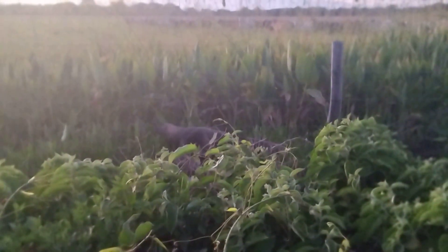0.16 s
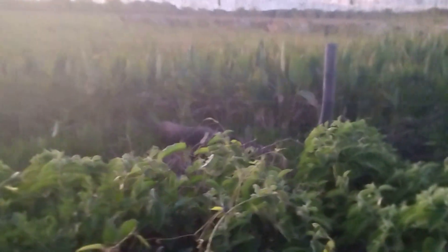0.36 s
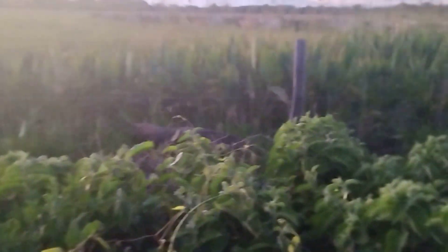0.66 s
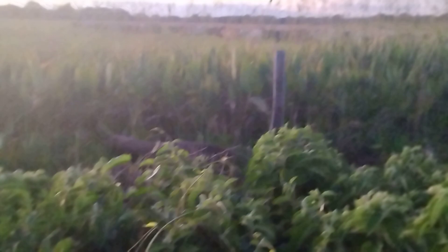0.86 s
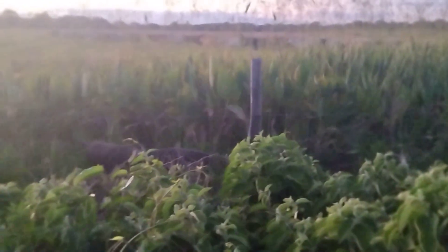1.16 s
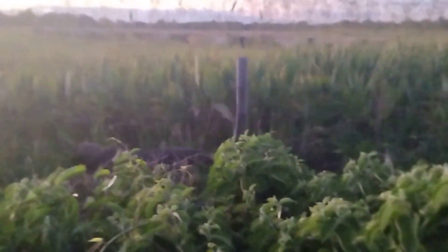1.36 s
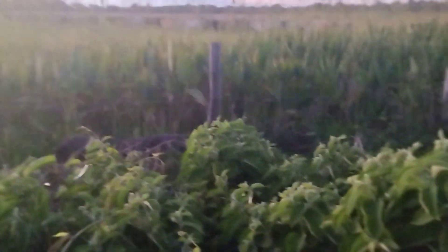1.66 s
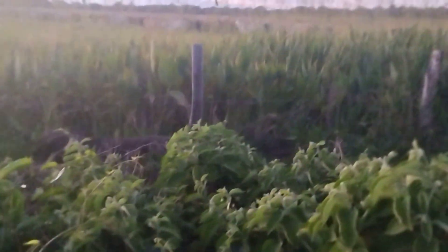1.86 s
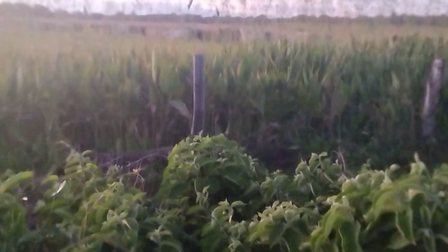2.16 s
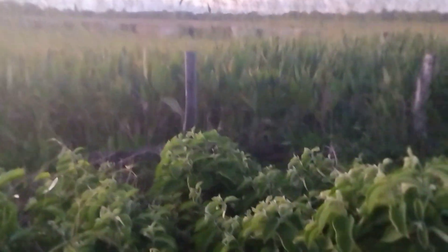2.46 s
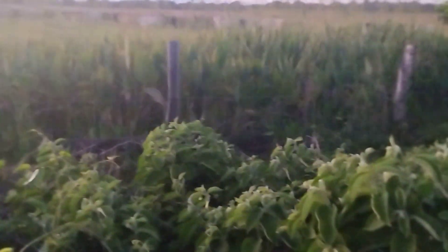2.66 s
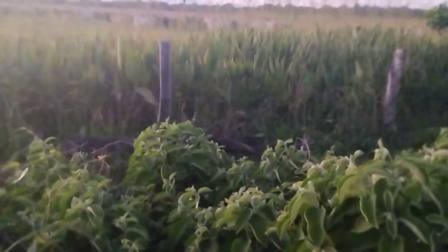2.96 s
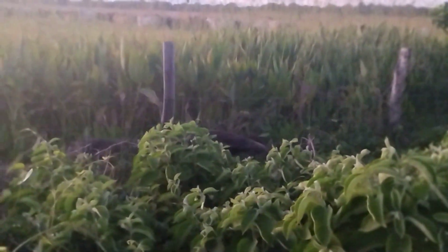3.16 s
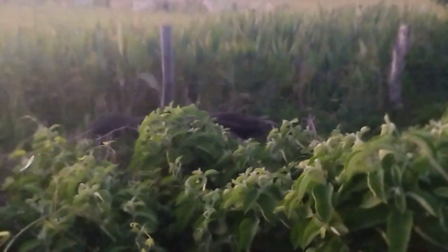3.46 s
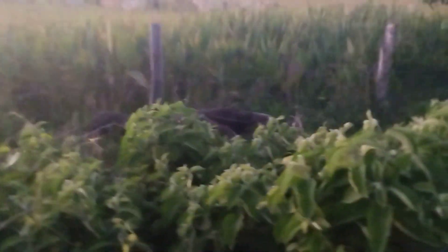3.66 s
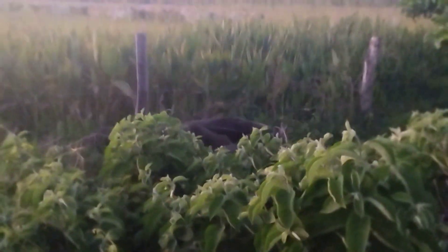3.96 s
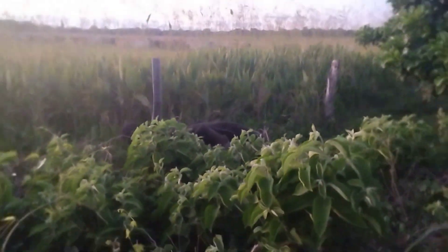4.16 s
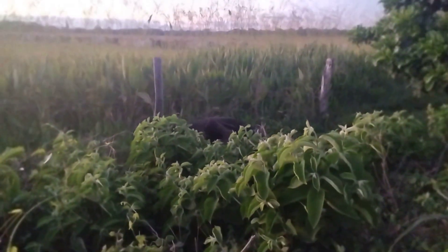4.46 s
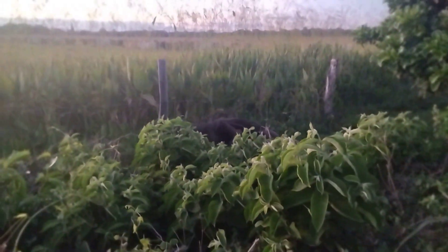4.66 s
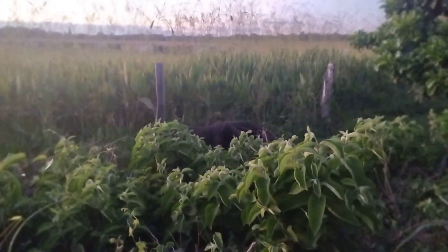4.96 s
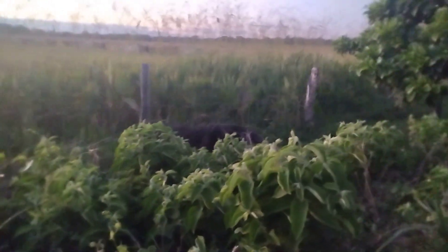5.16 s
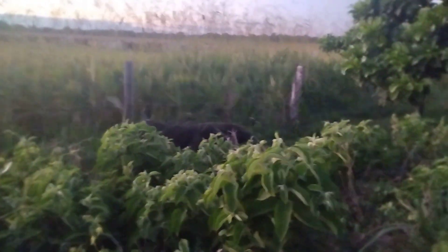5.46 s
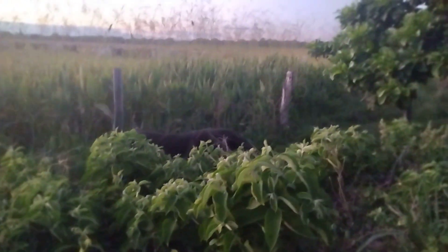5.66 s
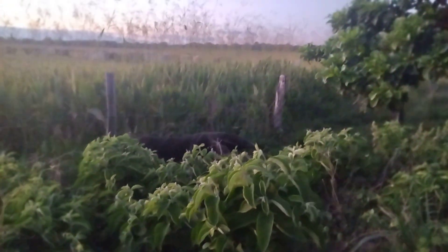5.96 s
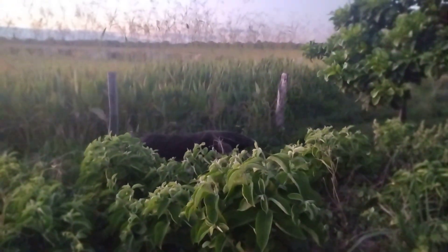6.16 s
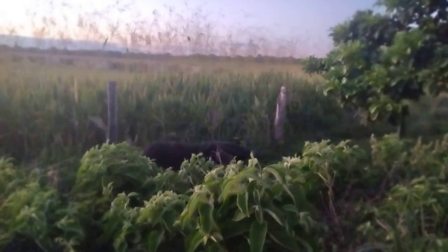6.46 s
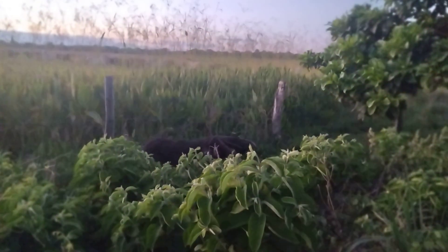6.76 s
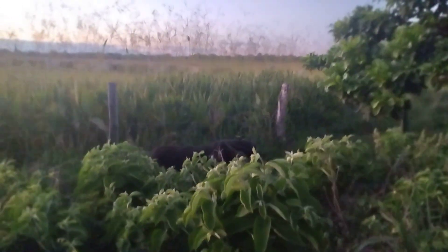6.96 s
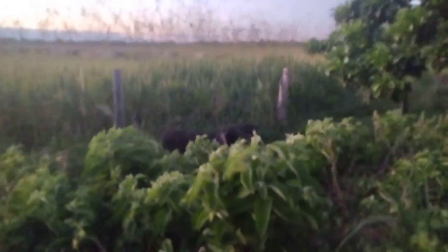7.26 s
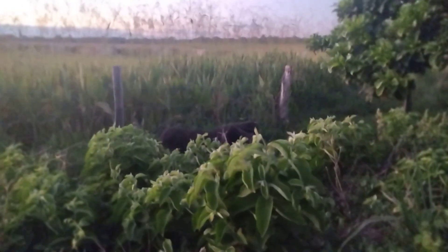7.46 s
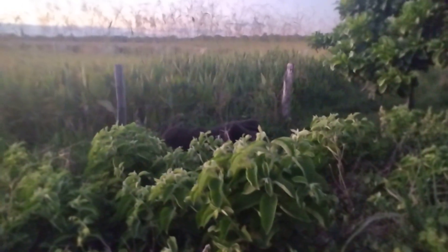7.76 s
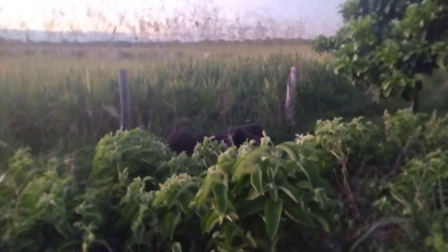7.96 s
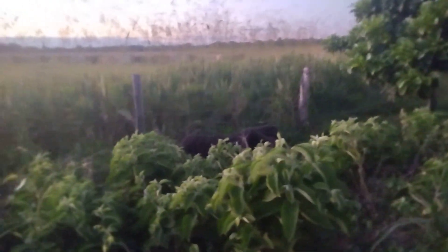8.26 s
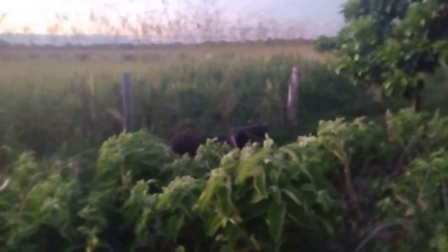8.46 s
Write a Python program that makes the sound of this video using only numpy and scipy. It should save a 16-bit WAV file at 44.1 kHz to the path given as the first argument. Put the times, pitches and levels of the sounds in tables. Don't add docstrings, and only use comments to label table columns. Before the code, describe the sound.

Dense, shrill insect song dominates: a fast cricket trill, a harsher katydid buzz pulsing about twice a second, and a steady needle-thin cicada whine. The katydid stops after five seconds, leaving the crickets thinner and gradually quieter. Tiny frogs croak, birds chirp faintly and a dove coos far off. Close to the handheld microphone, stems snap and tick, leaves brush, the hand bumps softly, and light breeze puffs low.

```python
import sys
import numpy as np
from scipy import signal
from scipy.fft import rfft, irfft, next_fast_len
from scipy.io import wavfile
from scipy.ndimage import uniform_filter1d

SR = 44100
rng = np.random.default_rng(int(sys.argv[2]) if len(sys.argv) > 2 else 0)


def volts_from_decibels(level):
    exponent = np.asarray(level, float) / 20
    return 10 ** exponent


def dump_mix(stems):
    frames = np.atleast_2d(stems).T
    limited = np.clip(frames, -1, 1)
    pcm = np.round(limited * 32767).astype(np.int16)
    wavfile.write(sys.argv[1], SR, pcm)


N = 380123
T = np.arange(N) / SR
FFT_SIZE = 2 * next_fast_len(N // 2 + 1)


def level(x, db):
    return x * volts_from_decibels(db) / np.sqrt(np.mean(x ** 2))


def curve(rows, off_db=-120):
    s, *columns = np.transpose(rows)
    return [np.interp(T, s, c, left=off_db, right=off_db) for c in columns]


def colour(x, points):
    hz, db = np.transpose(points)
    log_hz = np.log(hz)
    f = np.log(np.fft.rfftfreq(FFT_SIZE, 1 / SR) + 1)
    outside = np.maximum(log_hz[0] - f, 0) + np.maximum(f - log_hz[-1], 0)
    return irfft(rfft(x, FFT_SIZE) * volts_from_decibels(np.interp(f, log_hz, db) - 65 * outside), FFT_SIZE)[:N]


def band(x, hz, width_hz):
    return signal.lfilter(*signal.iirpeak(hz, hz / width_hz, fs=SR), x)


def resonate_twice(x, hz, width_hz):
    return band(band(x, hz, width_hz), hz, width_hz)


def walk(rate):
    k = int(SR / rate)
    held = np.repeat(rng.standard_normal(N // k + 1), k)
    return 1.3 * uniform_filter1d(uniform_filter1d(held, k), k)[:N]


def scatter(x, t60):
    fade = np.exp(-np.log(1000) * T[:SR // 8] / t60)
    paths = rng.standard_normal((2, len(fade))) * fade / np.sqrt(np.sum(fade ** 2))
    sway = 2.0 * walk(4)
    shares = np.sin(sway), np.cos(sway)
    return sum(share * signal.oaconvolve(x, path)[:N] for share, path in zip(shares, paths))


def add(out, s, piece):
    i = int(s * SR)
    out[i:i + len(piece)] += piece[:N - i]


def ring(hz, db, t60):
    t = T[:SR // 20]
    return volts_from_decibels(db) * np.sin(2 * np.pi * hz * t) * np.exp(-np.log(1000) * t / t60)


def strokes(beat, hz, fall_hz, duty, scatter_db, waver=0.0043, loose=3, lean=1.14, bend=1):
    k = np.floor(beat).astype(int)
    chance = rng.standard_normal((k.max() + 2, 3))[k].T
    part = np.clip((beat - k) / np.clip(duty, .1, .95), 0, 1)
    swell = np.abs(np.sin(np.pi * part ** lean)) ** .9 * (part < 1) * volts_from_decibels(scatter_db * chance[0])
    pitch_hz = (hz + fall_hz * (.5 - part ** bend)) * (1 + waver * chance[1])
    turns = np.cumsum(pitch_hz) / SR
    turns -= turns[np.searchsorted(np.maximum.accumulate(k), k)]
    return swell, 2 * np.pi * turns + loose * chance[2]


def field():
    # (frequency [Hz], density [dB per Hz])
    air_spectrum = [(12, -3), (20, 2), (30, -11.5), (42, -11), (207, -22.5), (283, -29), (334, -28),
                    (377, -29.5), (579, -31), (684, -31), (2310, -35.5), (2860, -40), (4000, -33.5),
                    (5450, -37.5), (6000, -38), (7800, -63), (13200, -120)]
    # (time [s], extra level [dB], length [s])
    puffs = [
        (.79, 3, 0.32),
        (1.4, 2.5, 0.091),
        (1.672, 4.5, 0.087),
        (3.93, 6.5, 0.065),
        (4.485, 6.5, 0.053),
        (6.05, 4, 0.27),
        (6.995, 7, 0.042),
        (7.488, 4, 0.17),
    ]
    lull_db = -0.5
    air = level(colour(rng.standard_normal(N), air_spectrum), -57.5)
    gust = walk(0.75)
    breeze_db = lull_db + sum(db * np.exp(-((T - s) / length) ** 2) for s, db, length in puffs)
    spectrum = rfft(air, FFT_SIZE)
    octave = np.log2(np.fft.rfftfreq(FFT_SIZE, 1 / SR) / 20 + 1e-9)
    out = 0
    for k in range(-1, 10):
        share = np.clip(1 - abs(np.maximum(octave, -1) - k), 0, 1)
        part = irfft(spectrum * share, FFT_SIZE)[:N]
        out = out + part * volts_from_decibels(.5 * gust - 0.17 * (T - 3.0) + 1.17 * walk(6.5) + breeze_db * (k < 4))
    hiss_spectrum = [(5500, -10.0), (12000, -11), (13500, -5), (14500, 24), (16000, 12)]
    return out + level(colour(rng.standard_normal(N), hiss_spectrum), -79.5)


def cricket():
    # (time [s], level [dB], lead of the wing beat on an even clock [strokes], leaf echo [dB])
    song = [(0, -38, -0.34, -7), (.4, -36.5, -0.33, -1), (.9, -32, -0.29, -10), (1.3, -31, -0.32, -7.5),
            (1.6, -28.5, -0.27, -14.5), (1.9, -33, -0.32, -17), (2.4, -33, -0.27, -9.5),
            (2.95, -33.5, -0.031, -9.5), (3.5, -29, 0.073, -9.5), (3.9, -30, 0.15, -5),
            (4.4, -32.5, 0.13, -10), (5.06, -31, 0.18, -7), (5.95, -33.5, .27, -9.5),
            (6.17, -45, 0.2, -0.5), (6.4, -36.5, 0.16, 2), (7.3, -40.5, 0.049, -11.5),
            (7.9, -37.5, -0.025, -13), (8.62, -37, -0.15, -5)]
    # (middle [s], skipped [strokes])
    pauses = [(.670, 4), (1.257, 4), (1.928, 4), (2.349, 4), (2.920, 4), (3.535, 4), (4.342, 3), (5.102, 4),
              (5.677, 4), (6.285, 4), (6.945, 2), (7.760, 3), (8.433, 3)]
    stroke_hz, echo_lag = 71.4, SR // 250
    db, lead, echo_db = curve(song)
    beat = stroke_hz * T + lead + 1.41
    swell, phase = strokes(beat, 7445, 380, .6, .7, waver=.0025, lean=1.9, bend=2.5)
    middle = T + (.25 - beat % 1) / stroke_hz
    for s, skipped in pauses:
        swell = swell * (abs(middle - s) > skipped / 2 / stroke_hz)
    tone = volts_from_decibels(db + .6 * walk(14)) * level(band(swell * np.sin(phase), 7540, 1300), 0)
    over_db = -65 - 2.5 * np.maximum(T - 6, 0)
    overtone = volts_from_decibels(over_db) * level(swell ** .4 * np.sin(2 * phase), 0)
    echo = scatter(volts_from_decibels(echo_db - 3) * tone + volts_from_decibels(-8.5) * overtone, 0.03)
    return volts_from_decibels(-1.48) * tone + volts_from_decibels(-2) * overtone + np.roll(echo, echo_lag)


def katydid():
    # (last click [s], click rate there [Hz], echo share [0-1], full level [dB], bright wing edge [dB])
    phrases = [
        (0.45, 130, 0.46, -38, -12),
        (.979, 130.6, 0.37, -38, -7),
        (1.523, 130.5, 0.65, -39.5, -8),
        (2.169, 131.6, 0.6, -45, -2),
        (2.602, 131.2, 0.9, -41, -13),
        (3.117, 130.5, 0.44, -41, -11),
        (3.617, 131.4, 0.67, -41.5, -13),
        (4.151, 128.2, 0.33, -34.5, -12),
        (4.6707, 130.2, 0.3, -35, -12),
        (5.1721, 128.7, 0.34, -39.5, -16.5),
    ]
    # (frequency [Hz], density [dB per Hz])
    wing_spectrum = [(7600, -20), (8300, -10), (8900, -5), (9400, -1), (10000, -1), (10600, -8.5),
                     (11300, -17), (12000, -24), (13000, -32)]
    # (time [s], level [dB])
    low_wing = [(0, -10), (.8, -20), (1.3, -33), (2.4, -19), (3.0, -22), (3.9, -9), (4.5, -5), (5.2, -20)]
    # (time [s], level [dB])
    far_singer = [(0, -57), (1, -45.5), (2.4, -51.5), (3.6, -53.5), (3.9, -51), (5.2, -70)]
    rest_s, stumble_s, resume_s, stop_early_s = .053, .072, .082, .004
    first_start_s, swell_s, dulls_s, slowing_hz_per_s = -0.18, 0.16, 0.29, 16
    false_start_db, soft_start_db = -5.5, -11
    ends = np.transpose(phrases)[0]
    phrase = np.minimum(np.searchsorted(ends + 0.0078, T), len(phrases) - 1)
    end, rate, echo, full_db, edge_db = np.transpose(phrases)[:, phrase]
    to_end = T - end
    beat = 2 * (rate * to_end - slowing_hz_per_s * to_end ** 2 / 2) + .25 + 200 * (phrase + 1)
    swell, phase = strokes(beat, 9800, 4600, .38, 1.5, waver=.01, loose=1.1, lean=1.1)
    shut = np.floor(beat) % 2 == 0
    clicks = swell * np.where(shut, np.sin(phase), volts_from_decibels(-9) * rng.standard_normal(N))
    since = T - np.append(first_start_s, ends)[phrase]
    going = np.maximum(since - resume_s, 0)
    effort = volts_from_decibels(soft_start_db * np.exp(-going / swell_s)) * (going > 0) * (T < end - stop_early_s)
    effort = effort + volts_from_decibels(false_start_db) * (since > rest_s) * (since < stumble_s)
    edge = level(resonate_twice(clicks, 11200, 1500), 0) * volts_from_decibels(edge_db) * np.exp(-going / dulls_s)
    wing = level(colour(clicks, wing_spectrum), 0)
    low = level(resonate_twice(clicks, 9220, 700), 0) * volts_from_decibels(curve(low_wing)[0])
    near = (wing + low + edge) * uniform_filter1d(effort * volts_from_decibels(full_db), size=150)
    far = volts_from_decibels(curve(far_singer)[0] + 2.0 * walk(7.65)) * wing[::-1]
    echo = np.clip(echo, 0, 1)
    return np.sqrt(1 - echo) * near + scatter(np.sqrt(echo) * near + far, 0.13)


def cicada():
    # (time [s], rate [clicks per s])
    click_rate = [(0, 144.2), (.6, 143.97), (.77, 144.05), (.87, 144.75), (1.17, 145.4), (1.37, 145.92),
                  (1.77, 146.02), (2.07, 145.9), (2.9, 145.07), (4.0, 144.32), (4.45, 144.1),
                  (4.58, 144.25), (4.67, 144.8), (5.07, 145.83), (5.82, 146.16), (6.97, 144.97),
                  (7.7, 144.45), (8.62, 144.15)]
    # (frequency [Hz], width [Hz], level of one partial [dB])
    body_modes = [(7610, 130, -49), (7920, 150, -48.5), (8160, 90, -49), (8390, 110, -53.5),
                  (8660, 200, -62), (9250, 400, -67)]
    # (time [s], level [dB])
    loudness = [(0, 0), (2, -1), (4.5, 1), (6.8, 0), (7.6, -4), (8.62, -9)]
    phase = 2 * np.pi * np.cumsum(curve(click_rate)[0] * (1 + 4e-5 * walk(12))) / SR
    clicks = np.sqrt(2) * sum(np.cos(k * phase) for k in range(50, 66) if k != 54)
    body = sum(volts_from_decibels(db) * resonate_twice(clicks, hz, 1.3 * width_hz) for hz, width_hz, db in body_modes)
    return body * volts_from_decibels(curve(loudness)[0] + 2.1 * walk(6))


def chorus():
    # (frequency [Hz], density [dB per Hz])
    blur_spectrum = [(3410, -28.5), (5800, -42.5), (6350, -24.5), (6550, -18), (7250, -1), (7600, -2),
                     (8060, -5), (9070, -10.5), (9180, -13), (12000, -32.5), (15600, -34), (22000, -120)]
    # (time [s], level [dB])
    blur_db = [(0, -43), (1.8, -43), (2.6, -42), (3.7, -43), (4.56, -40.5), (5.74, -44.5), (7.2, -46),
               (8.62, -47)]
    # (start [s], full at [s], end [s], pitch [Hz], fall [Hz], rate [strokes per s], level [dB])
    neighbours = [
        (2.0, 2.7, 3.24, 6340, 1110, 140, -60),
        (5.5, 6, 9.7, 6700, 240, 79, -59),
        (5.999, 5.5, 7.72, 7410, 639.5, 72, -41),
        (6.1, 6.3, 7.11, 7050, 497, 100, -51),
    ]
    blur = colour(rng.standard_normal(N), blur_spectrum[1:]) * volts_from_decibels(1.47 * walk(30))
    blur = level(blur, 2.96) * volts_from_decibels(curve(blur_db)[0])
    songs = 0
    for start, full, end, hz, fall_hz, rate, db in neighbours:
        swell, phase = strokes(rate * T + .3 * walk(0.93) + 2, hz, fall_hz, .55, 1.6)
        fade_in = np.clip((T - start) / max(full - start, .02), 0, 1)
        fade_out = np.clip((end - T) / .004, 0, 1)
        songs = songs + level(swell * np.sin(phase), db) * volts_from_decibels(1.0 * walk(2.86)) * fade_in * fade_out
    return blur + 0.85 * songs + 0.3 * scatter(songs, 0.057)


def dove():
    # (start [s], end [s], level [dB])
    coos = [
        (0.061, .5, -77),
        (1.0, 1.398, -88),
        (2.704, 3.3, -79),
        (3.85, 4.602, -77.5),
        (5.15, 6.05, -80),
        (6.101, 6.4, -82),
        (7.2, 7.605, -77),
    ]
    gate = sum(volts_from_decibels(db) * np.clip(np.minimum(T - a, b - T) / 0.072, 0, 1) for a, b, db in coos)
    return gate * level(resonate_twice(rng.standard_normal(N), 339, 30), 0)


def frog():
    # (time [s], peak [dB], pitch [Hz])
    croaks = [(0.4928, -59, 4100), (0.6055, -58, 4090), (1.3379, -55, 4070), (1.5219, -54, 4180),
              (1.8407, -57, 4230), (1.935, -64, 2720), (2.028, -60, 4100), (2.0643, -54, 4300),
              (2.711, -52, 4290), (3.1018, -58, 4490), (3.1807, -55, 4350), (3.2839, -53, 4380),
              (3.42, -47, 4280), (3.485, -45.5, 4170), (3.6182, -54, 4120), (3.6594, -59, 4230),
              (3.884, -53, 4080), (4.5346, -56, 4360), (4.786, -53, 4100), (4.9776, -58, 3940),
              (5.26, -58, 4500), (5.33, -56, 4150), (5.502, -54, 4020), (5.535, -55, 4370),
              (5.755, -46, 4440), (5.9224, -59, 4000), (6.131, -53, 4140), (6.368, -53, 3980),
              (6.562, -57, 3950), (6.766, -58, 4400), (7.604, -50.5, 3960), (8.326, -54, 3910),
              (8.579, -48.5, 3970)]
    out = np.zeros(N)
    far = rng.random((200, 3)) * [N / SR - .1, 6, 1000] + [0, -71, 3600]
    for s, db, hz in list(croaks) + list(far):
        for k in range(3):
            add(out, s + 0.012 * k, ring(hz * (1 - 0.014 * k), db - 7 * k, 0.026))
    return 0.7 * out + 0.95 * scatter(out, 0.07)


def ticks():
    # (time [s], peak [dB], ring [Hz], bright crack [dB])
    taps = [(0.771, -50, 606, -69), (1.545, -58, 2500, -57), (1.615, -55, 900, -59), (2.659, -49, 970, -60),
            (2.958, -50.5, 566, -64), (2.982, -50, 1420, -59), (3.149, -47.5, 1010, -54),
            (3.633, -37.5, 1130, -75), (3.741, -27, 1050, -67), (3.804, -36.5, 1950, -69),
            (3.924, -36.5, 473, -74), (4.164, -53, 415, -67), (4.309, -60, 1030, -47),
            (4.485, -45.5, 920, -54), (5.032, -53, 1570, -58), (5.221, -45, 1400, -60),
            (5.268, -45.5, 1260, -62), (5.321, -46, 1020, -57), (5.448, -59, 2570, -52),
            (5.452, -56, 3000, -54), (5.47, -60, 2800, -52), (5.473, -58, 3200, -48.5),
            (5.476, -62, 4500, -50), (5.517, -48, 2080, -59), (5.537, -46, 1900, -62),
            (5.573, -46, 2500, -54), (5.583, -48, 493, -68), (5.59, -56, 2400, -59),
            (5.614, -43, 2150, -58), (5.642, -44, 5900, -54), (5.643, -54, 2800, -60),
            (6.215, -53, 888, -64), (6.297, -58, 428, -57), (7.133, -49, 1000, -58),
            (7.132, -51, 3000, -64), (7.388, -37, 2290, -72)]
    out = np.zeros(N)
    for s, db, hz, crack_db in taps:
        add(out, s, ring(hz, db - 0.5, 9 / hz) + ring(4400, crack_db + 15.0, 0.002))
    return out


def birds():
    # (start [s], length [s], from [Hz], to [Hz], level [dB])
    slides = [(1.04, .07, 4600, 3950, -72), (1.11, .06, 3950, 3880, -73), (1.12, .11, 5850, 5100, -77),
              (1.23, .1, 5070, 3930, -76), (1.96, 0.2, 3110, 3050, -82), (3.81, .06, 1980, 1700, -74),
              (6.78, .09, 4150, 4300, -74), (2.75, 0.2, 4540, 3660, -61.5),
              (3.638, .035, 3750, 3250, -61.5), (3.673, 0.045, 3200, 2400, -61),
              (3.05, 0.19, 3040, 3010, -67), (3.255, 0.047, 2940, 2560, -61),
              (3.59, 0.012, 3030, 2850, -65), (2.935, 0.022, 3790, 3800, -69),
              (3.743, 0.049, 2340, 2030, -59.5), (3.94, 0.13, 3670, 3540, -74),
              (4.5, .15, 3620, 3590, -76.5), (5.05, .16, 5250, 3820, -75.5), (6.36, 0.044, 3750, 3650, -74),
              (6.917, .013, 6300, 4640, -61), (6.929, 0.033, 4650, 3130, -60.5),
              (7.113, 0.034, 5800, 4200, -65), (7.14, .013, 4260, 4050, -61),
              (7.04, 0.071, 4040, 3800, -76)]
    # (start [s], length [s], from [Hz], to [Hz], level [dB])
    hooks = [
        (3.385, 0.18, 4900, 3400, -58),
        (3.57, .05, 3380, 3400, -76),
        (4.14, 0.13, 3730, 3570, -75),
        (6.47, 0.15, 3760, 3640, -74),
    ]
    settle_s, attack, release = .018, .15, .12
    out = np.zeros(N)
    for notes, settles in ((slides, False), (hooks, True)):
        for s, length, from_hz, to_hz, db in notes:
            t = T[:int(length * SR)]
            left = np.exp(-t / settle_s) if settles else 1 - t / length
            hz = to_hz + (from_hz - to_hz) * left
            edge = np.clip(np.minimum(t / attack, (length - t) / release) / length, 0, 1)
            swell_db = 0 if settles else 8 * (t / length - 0.68)
            whistle = np.sin(2 * np.pi * np.cumsum(hz) / SR)
            add(out, s, np.sqrt(2) * edge * volts_from_decibels(db + swell_db) * whistle)
    return out * volts_from_decibels(2.2 * walk(140)) + volts_from_decibels(-7) * scatter(out, 0.23)


def rustle():
    # (start [s], loudest [s], end [s], bright leaf rustle [dB], dull stem scrape [dB])
    brushes = [
        (3.7, 3.758, 4.3, -64, -79),
        (2.448, 2.57, 2.7, -61, -74),
        (4.2, 4.304, 4.36, -53, -80),
        (5.212, 5.235, 5.42, -55, -63),
        (5.31, 5.33, 5.4, -67, -64),
        (5.428, 5.477, 5.9, -69, -81),
        (5.49, 5.645, 5.655, -61, -71),
        (5.733, 5.75, 5.9, -61, -73),
        (6.977, 7.025, 7.1, -69, -56.5),
    ]
    edge_db = -15.5
    grains = rng.standard_normal(N) * volts_from_decibels(1.7 * rng.exponential(size=N) + 3.2 * walk(150))
    leaves = band(grains, 4060, 1600) + 0.41 * band(grains, 2100, 700) + 0.79 * band(grains, 1490, 530)
    leaves = level(leaves, -1.9)
    stems = band(band(grains, 1220, 770), 1090, 780) + 0.76 * resonate_twice(grains, 2900, 1500)
    stems = level(stems, 0)
    out = np.zeros(N)
    for a, top, b, leaf_db, stem_db in brushes:
        sweep = volts_from_decibels(curve([(a, edge_db), (top, 0), (b, edge_db)])[0])
        out += sweep * (volts_from_decibels(leaf_db) * leaves + volts_from_decibels(stem_db) * stems)
    return out


def snaps():
    # (time [s], modes as (frequency [Hz], level [dB], t60 [s]))
    breaks = [
        (8.2268, [(1200, -41, .005), (4000, -41, .002), (2400, -50, .002)]),
        (6.9915, [(900, -42, .01)]),
        (7.1872, [(3200, -42, .0012), (700, -50, .004)]),
        (7.0002, [(1000, -26.5, .012), (3500, -42, .002), (504, -41.5, 0.022)]),
        (7.1982, [(1900, -30, .003), (3200, -29, .002), (5000, -31, 0.0018), (600, -39, .008)]),
        (3.7027, [(6700, -3.5, .003), (13000, -3, .001), (10500, -6, 0.0018), (3500, -40, 0.0048), (1820, -49, .008)]),
    ]
    attack_turns = 0.13
    t = T[:SR // 20]
    out = np.zeros(N)
    for s, modes in breaks:
        push = 0
        for hz, db, t60 in modes:
            attack = np.clip(t * hz / attack_turns, 0, 1)
            push = push + ring(hz, db, t60) * attack * SR / (2 * np.pi * hz)
        add(out, s, np.diff(push, prepend=0))
    return out


def thumps():
    # (time [s], peak [dB], ring [Hz])
    knocks = [
        (3.923, -40.5, 161),
        (4.18, -48, 170),
        (4.489, -65, 80.7),
        (5.213, -47, 168),
        (6.496, -44.5, 110),
    ]
    out = np.zeros(N)
    for s, db, hz in knocks:
        add(out, s, ring(hz, db, 0.062) * np.clip(T[:SR // 20] / 0.0024, 0, 1))
    return out


def wing_flicks():
    # (time [s], peak [dB])
    flicks = [
        (5.4515, -36),
        (6.19, -39.5),
        (7.9374, -59),
    ]
    out = np.zeros(N)
    for s, db in flicks:
        add(out, s, volts_from_decibels(db) * band(rng.standard_normal(900), 9300, 3000) * np.hanning(900))
    return out


def scene():
    insects = cricket() + katydid() + cicada() + chorus()
    animals = dove() + frog() + birds()
    close_by = ticks() + rustle() + snaps() + thumps() + wing_flicks()
    return (field() + insects + animals + close_by)[None, :]


def top_cut(x):
    return signal.sosfilt(signal.butter(12, 16780, fs=SR, output="sos"), x)


def record(dry):
    duck_s, duck_db, hold_s, release_s = 3.7045, -5, 0.098, 0.0056
    since = T - duck_s
    recovery = np.exp(-np.maximum(since - hold_s, 0) / release_s)
    ducked = dry * volts_from_decibels(duck_db * (since > 0) * recovery)
    cut = signal.sosfilt(signal.ellip(8, .3, 32, 15750, fs=SR, output="sos"), ducked)
    return top_cut(cut)


dry = scene()
out = record(dry)
dump_mix(out)
```